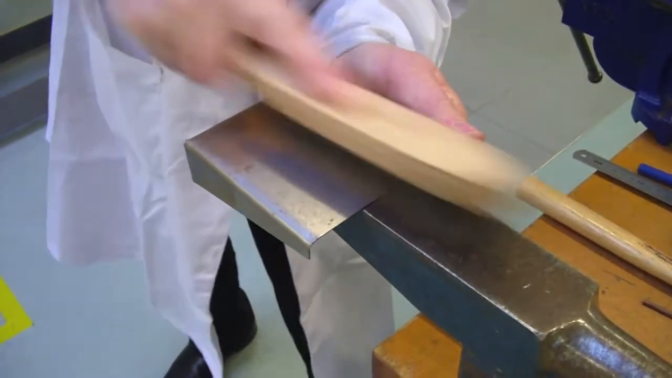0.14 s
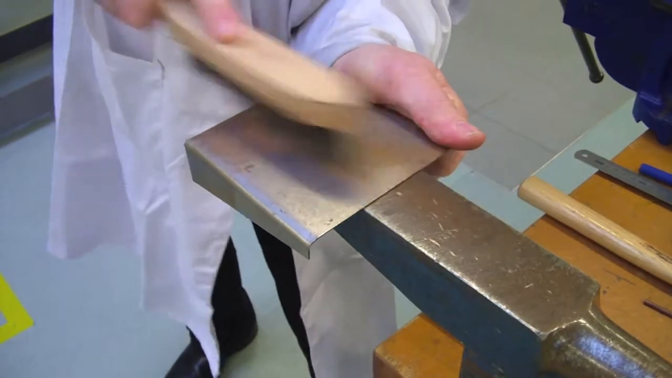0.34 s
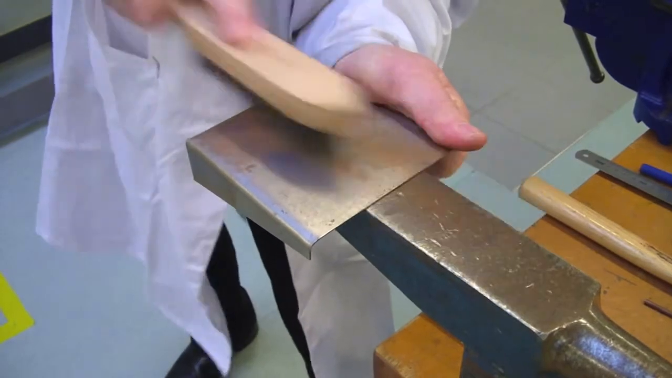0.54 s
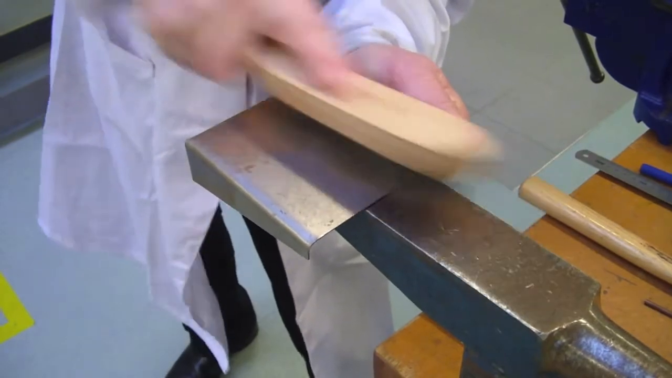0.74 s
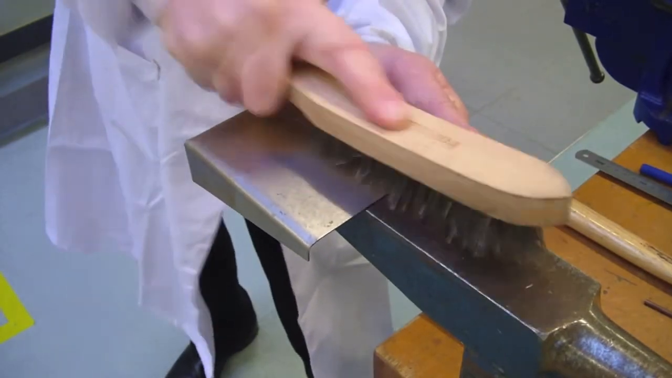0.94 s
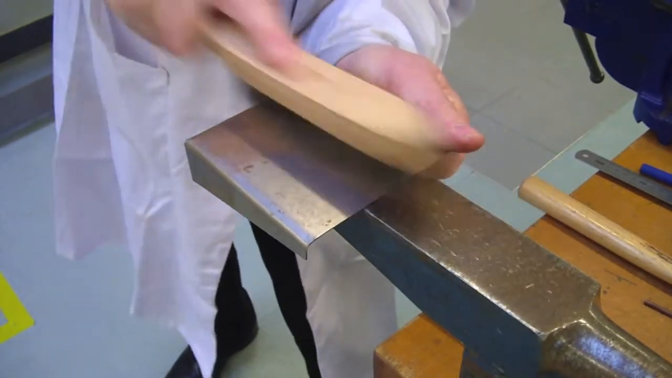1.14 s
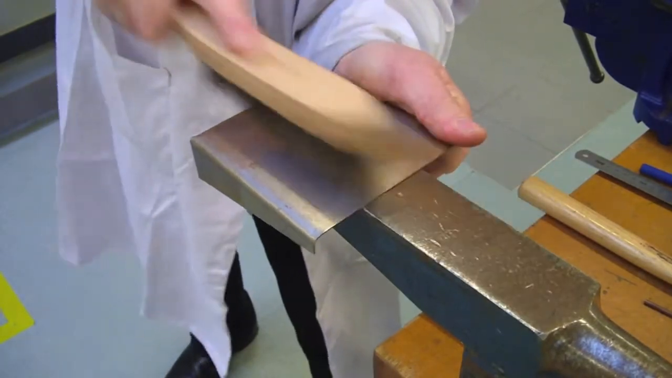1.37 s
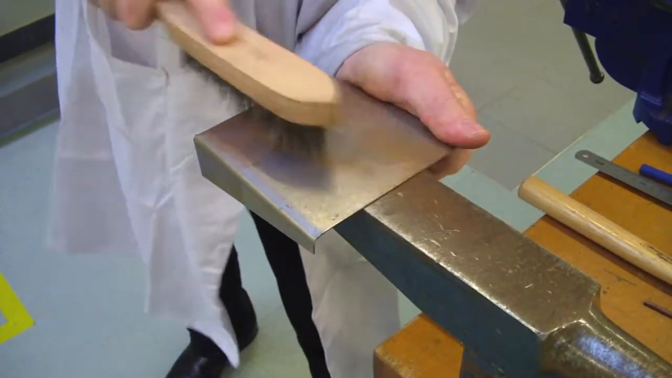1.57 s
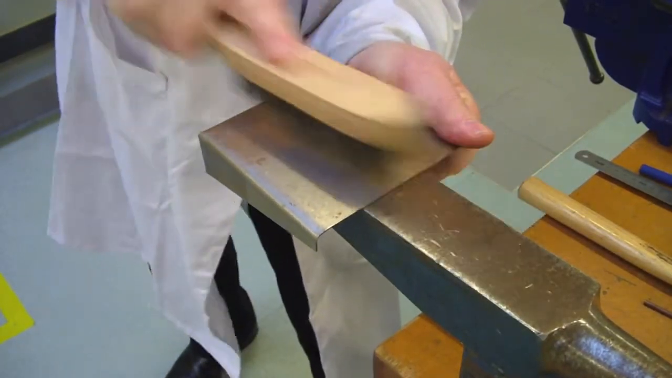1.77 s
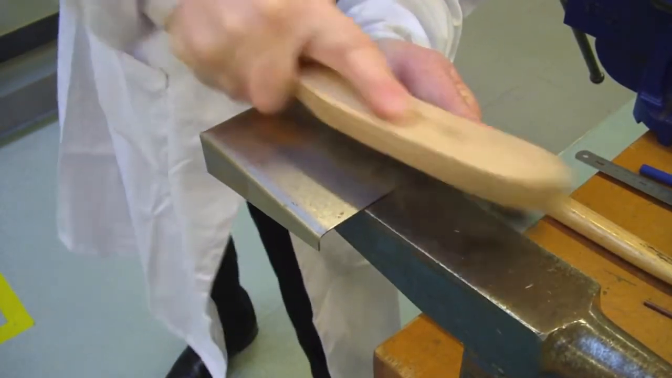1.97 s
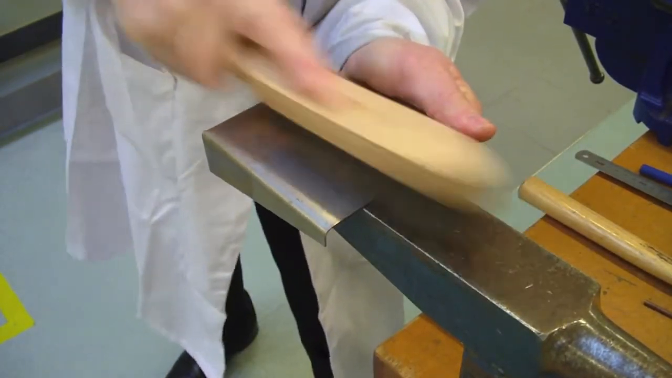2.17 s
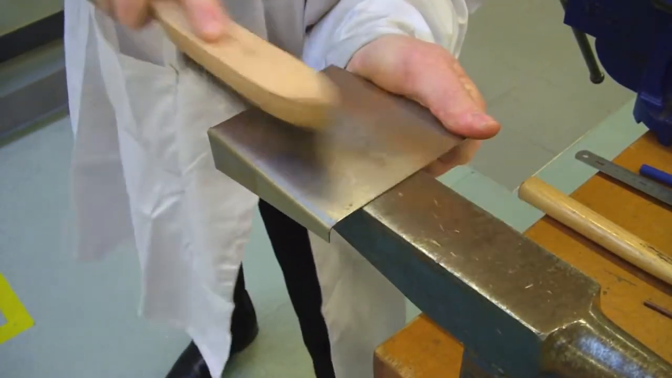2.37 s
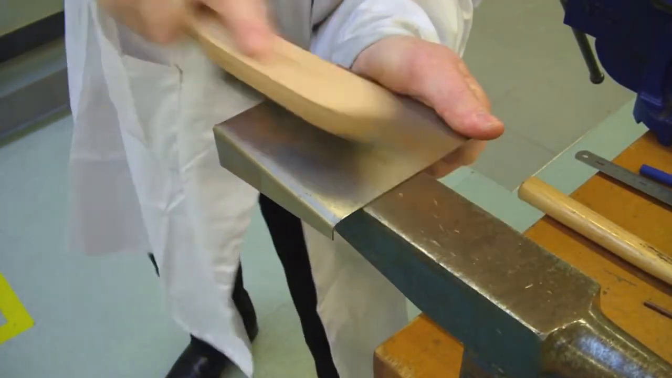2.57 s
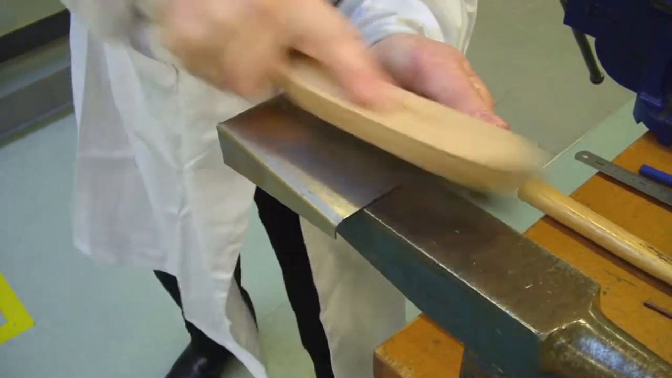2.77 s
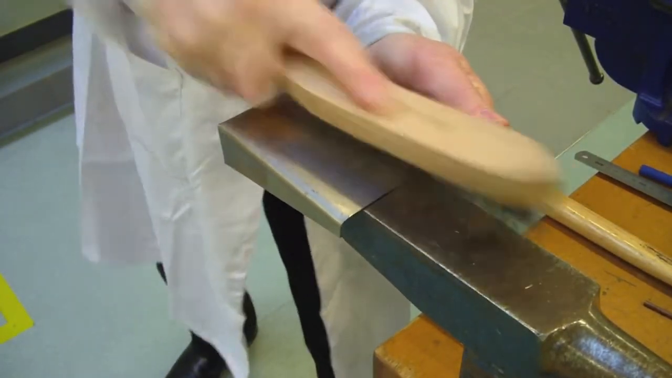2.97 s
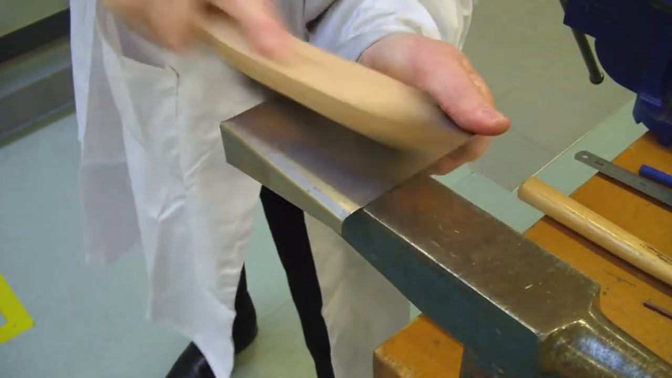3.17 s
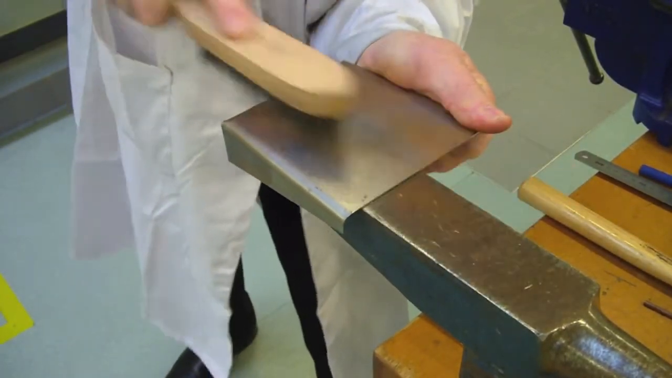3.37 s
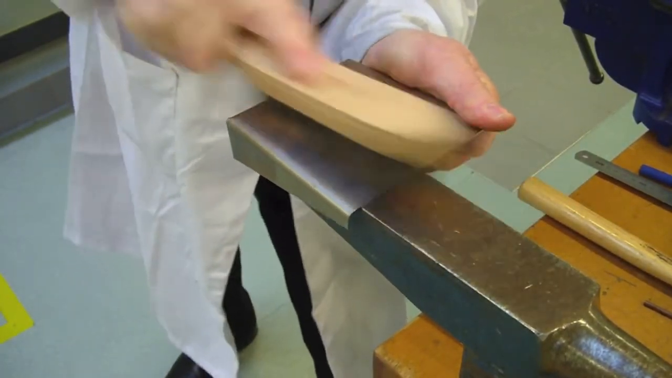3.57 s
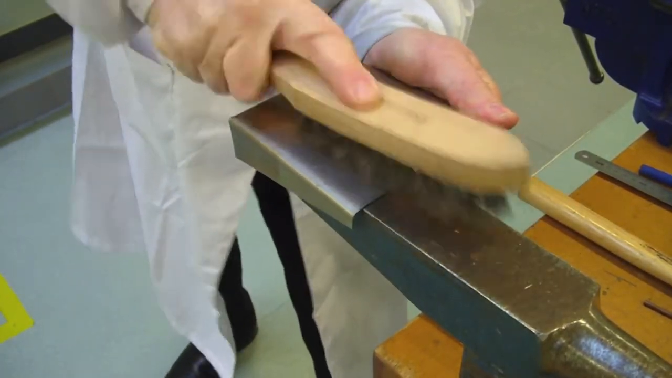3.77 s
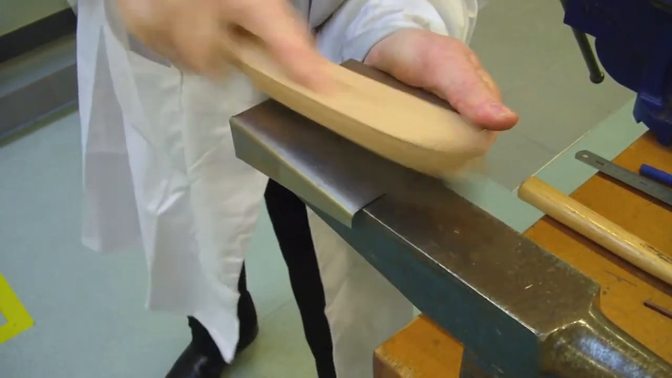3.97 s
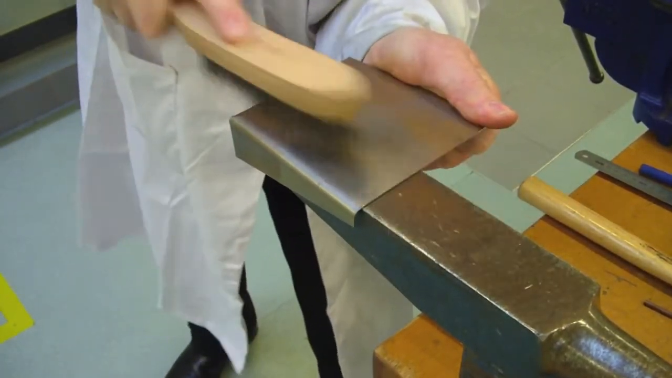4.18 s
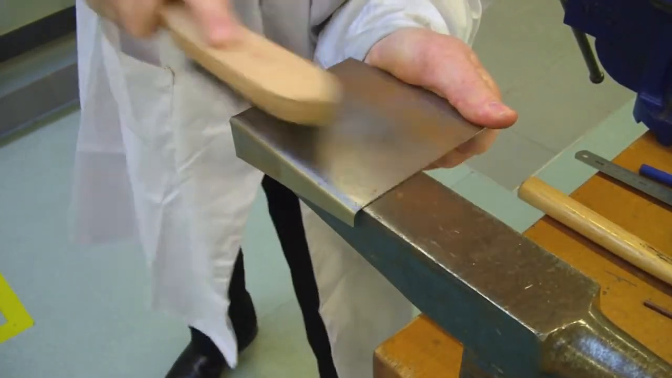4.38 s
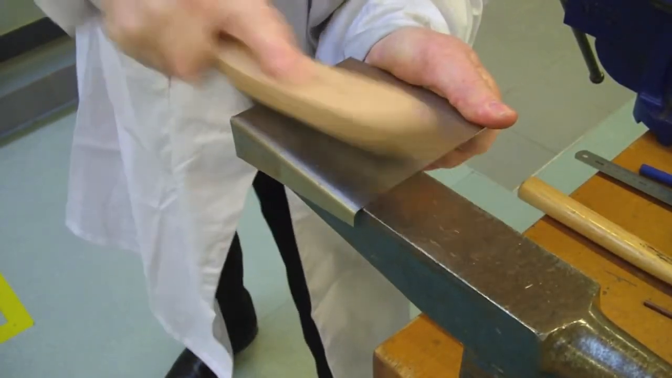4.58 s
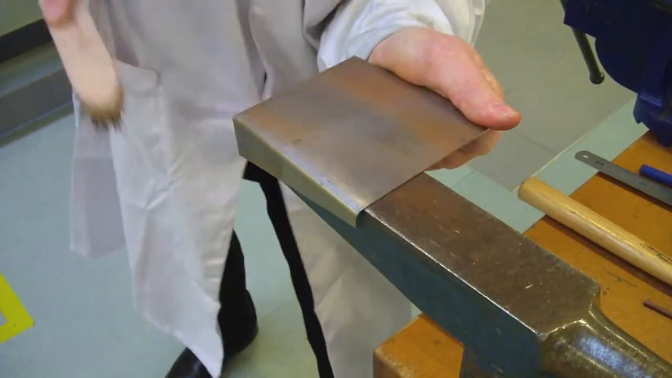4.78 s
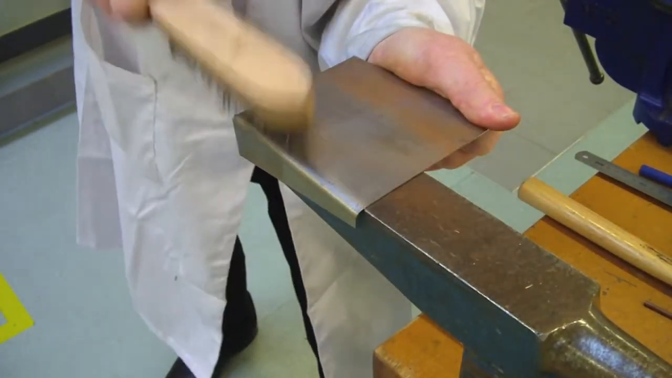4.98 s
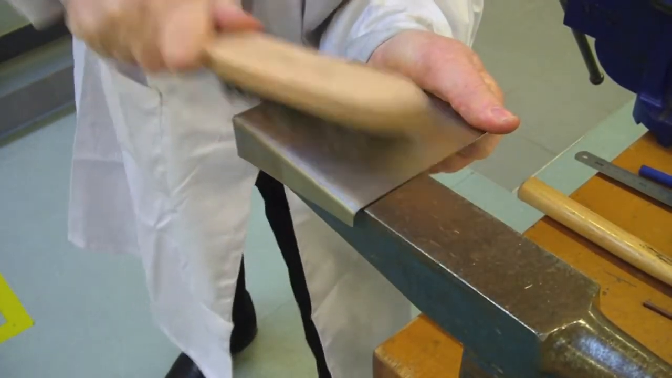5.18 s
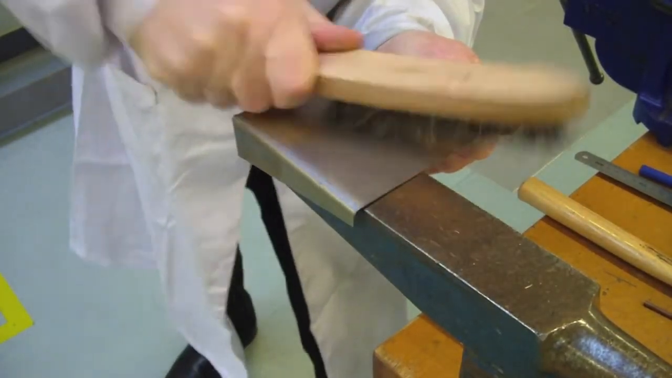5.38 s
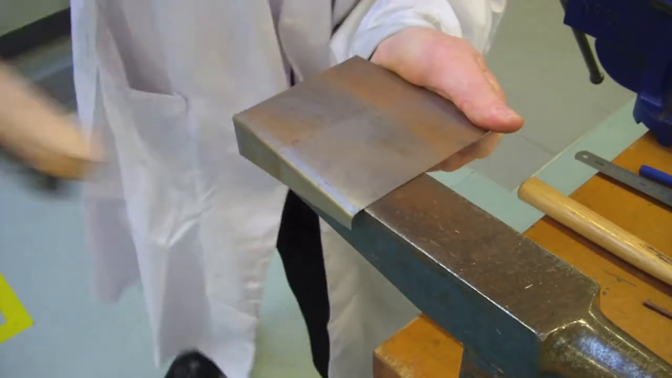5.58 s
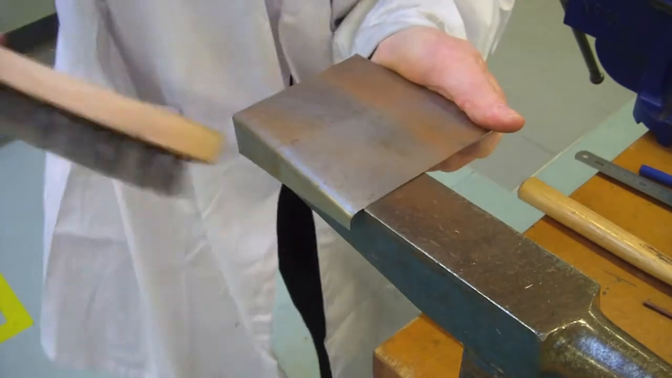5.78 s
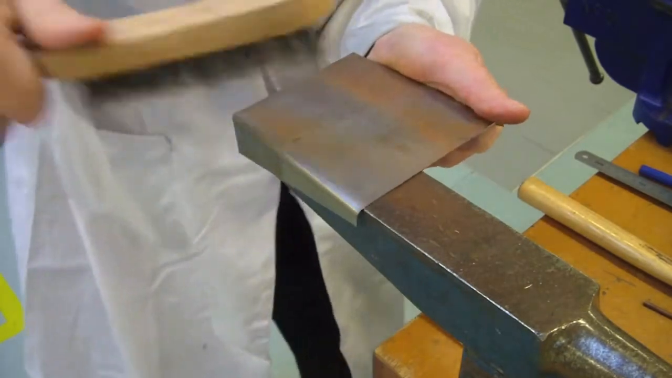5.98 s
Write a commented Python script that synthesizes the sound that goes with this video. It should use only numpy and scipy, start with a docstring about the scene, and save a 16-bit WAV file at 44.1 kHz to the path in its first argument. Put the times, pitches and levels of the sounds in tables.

```python
"""In a workshop, a hand wire brush scrubs a bent steel sheet held on an anvil, to and fro about eight strokes
a second; after a pause come a few sideways sweeps, then a faint rustle.
Wire tips slip over the rust as dense clicks that ring in the wires and drive the sheet and the wooden brush back.
Tufts catch and let go, wires squeak, the wood taps the sheet; behind it lie room tail, hiss and a faint hum.
A small stereo recorder hears it through two ports, with narrow notches cut by the recorder."""
import sys
import numpy as np
from scipy import signal
from scipy.fft import rfft, irfft
from scipy.io import wavfile
from scipy.ndimage import uniform_filter1d, minimum_filter1d

SR = 44100
rng = np.random.default_rng(int(sys.argv[2]) if len(sys.argv) > 2 else 0)


def to_wav(sig):
    """Store sig (one row per channel, or 1-D mono) as 16-bit WAV at the path in sys.argv[1].

    Samples outside -1..1 are clipped; the rate is SR.
    """
    pcm = np.clip(np.atleast_2d(sig), -1, 1) * 32767
    pcm = np.round(pcm).astype(np.int16)
    wavfile.write(sys.argv[1], SR, pcm.T)  # frames by channels


N = 265780

# Workshop air, spectrum of its hiss: (frequency [Hz], density [dB per Hz])
AIR_SPECTRUM = [(30, -24), (100, -10.5), (190, -11), (300, -2), (700, -1.5), (1300, -2), (3500, 2.5),
                (5700, -4), (7000, -13), (8500, -16), (11000, -38), (15000, -55)]
AIR_DB = -56.5
HUM_HZ, HUM_WIDTH_HZ, HUM_DB = 285.6, 7, -76.5
SHOP_T60_S, SHOP_DB = 0.36, -18   # decay time of the room tail and its level against the direct sound

# Wood of the brush taps the sheet: (time [s], level [dB], crack pitch [Hz], ring against crack [dB])
TAPS = [(4.747, -24, 1220, -10.5), (4.776, -28.5, 3200, -20), (5.027, -13, 2270, -25.5),
        (5.585, -26, 3260, -26), (5.588, -16, 3300, -13.5), (5.786, -43.5, 2770, -12),
        (5.865, -43, 1970, -11), (5.994, -39, 1070, -25)]
# Modes of the tapped sheet: (frequency [Hz], level [dB], t60 [s])
TAPPED_MODES = [(601, -9.5, 0.077), (1316, -1, 0.05), (1640, -2.5, 0.061), (2680, 4, 0.076),
                (2930, 2, 0.056), (3400, 1.5, 0.062), (4630, -13, 0.05), (5600, -13, 0.17)]
# A wire squeaks upward as it drags to a halt:
# (start [s], length [s], from pitch [Hz], to pitch [Hz], level [dB])
SQUEAKS = [(0.066, 0.024, 8200, 9260, -28.5), (0.862, 0.014, 8800, 9300, -29),
           (1.606, 0.034, 8460, 9200, -29), (1.857, 0.027, 8720, 9000, -31),
           (4.735, 0.025, 9000, 9600, -39)]
# A tuft catches and springs free: (time [s], level [dB], twang pitch [Hz])
CATCHES = [(0.3168, -5, 3930), (0.8032, 4, 4030), (1.0647, 5.5, 4090), (1.1287, -19, 4000),
           (1.5791, -5.5, 3900), (1.692, -1, 4150), (1.8117, -7.5, 3800), (2.0808, 2, 4160),
           (2.4389, -20, 4300), (2.6998, -11, 3850), (2.849, -6.5, 4100), (3.6133, -9, 4070),
           (4.153, -5, 4260), (4.546, -14, 3460), (5.025, -4.5, 4220), (5.0424, -22, 4000),
           (5.0998, -9, 3570), (5.232, -8, 5900), (5.2716, -14, 5530), (5.5654, -13, 4340)]

# To-and-fro strokes, pull and push in turn:
# (start [s], length [s], level [dB], first bite over that level [dB])
STROKES = [(-0.004, 0.11, -18.5, -2), (0.134, .105, -16.5, 5), (0.26, 0.11, -19, -2), (0.39, 0.1, -17.5, 1),
           (0.509, 0.11, -17, -2.5), (0.647, 0.11, -18, 3), (0.759, 0.13, -19.5, 0.7),
           (0.894, 0.11, -18, 3), (1.016, 0.12, -19, 0.5), (1.158, 0.11, -18.5, 0), (1.282, 0.1, -17.5, -3),
           (1.413, 0.1, -16.5, 1.5), (1.525, .11, -18, -1.5), (1.657, 0.096, -17.5, 1.5),
           (1.771, 0.11, -19, -3), (1.908, .114, -19, 3.5), (2.027, 0.13, -20, -0.5),
           (2.168, 0.12, -17.5, -.8), (2.292, 0.12, -18, -2.5), (2.429, 0.11, -15.5, 0),
           (2.549, 0.12, -15.5, -3), (2.69, 0.099, -15, 3), (2.805, 0.13, -20, 3.5),
           (2.947, 0.11, -17.5, 3.5), (3.077, 0.1, -17, -1), (3.206, 0.1, -17, 5), (3.327, 0.13, -19, -0.2),
           (3.47, 0.11, -16.5, 2.2), (3.587, 0.13, -22.5, 3.5), (3.722, 0.11, -14.5, -3.5),
           (3.85, 0.1, -16, -3), (3.98, 0.099, -15.5, .4), (4.099, 0.089, -22, 3), (4.229, 0.094, -23, 2.5),
           (4.35, 0.11, -25, -1.5), (4.472, 0.12, -24, -0.5), (4.6, 0.12, -22, -3.5),
           (4.725, 0.028, -27.5, 1.5)]
# Sideways sweeps after the pause, with shallower turns: columns as for STROKES
SWEEPS = [(5.025, 0.14, -23.5, 0.6), (5.205, .082, -18, -4.5), (5.329, 0.1, -17, 1), (5.451, 0.05, -22, .4),
          (5.509, .074, -24, 3.5)]
# A faint rustle at the end: one row, columns as for STROKES
RUSTLE = (5.868, 0.2, -50.5, -3)
# What all pulls share, levels against the stroke's own:
# (rise [s], exit level [dB], rest at the turn [dB], sheet level [dB], wood level [dB])
PULL_SHAPE = (0.0146, -4, -15.5, -16, -34.5)
# What all pushes, all sweeps and the rustle share: columns as for PULL_SHAPE
PUSH_SHAPE = (.011, -4, -14, -12.5, -33.5)
SWEEP_SHAPE = (.012, -0.6, -8, -16.5, -31.5)
RUSTLE_SHAPE = (.006, -8, -11, -7, -18)
LIFTED_DB = -62   # tips with the brush off the sheet

# Slow change of colour as the brush works over the sheet:
# (time [s], low wires [dB], high wires [dB], sheet [dB], wood [dB])
COLOUR = [(0, 6.5, 1, 0, 1.5), (1.1, 4, -0.2, -0.8, 0.9), (2, 4.5, -0.5, -0.5, 1.7),
          (2.5, -5.5, -1.5, -2.2, -0.5), (3.3, -5.5, -0.9, 0, 1.5), (4.1, -2, 1.5, -0.3, 2.8),
          (4.7, -.6, 1.5, 0, 4), (5.1, -1, -1, 1, -0.5), (5.6, -6.5, 0, -1.3, 2.5), (6, 13, -0.5, 0, 2)]
# Broad resonances of the sheet under the brush: (frequency [Hz], nominal width [Hz], level [dB])
SHEET_MODES = [(1004, 23, -14), (1226.4, 126, -3.5), (1488, 184, 1), (1735, 83, 2), (2322, 170, 0.5)]
# Broad resonances of the wooden brush back: columns as for SHEET_MODES
WOOD_MODES = [(394.6, 76, -5), (467, 120, -8.5), (584, 113, 3), (823, 510, -0.5)]
# Spectrum of the wire tips: (frequency [Hz], density [dB per Hz])
TIP_SPECTRUM = [(700, -59), (1500, -12.5), (2200, -11), (3100, -4), (4200, 1.5), (4900, -4.5), (5600, -0.5),
                (6600, -8), (7100, -14), (8500, -18.5), (11000, -25), (13000, -30), (14000, -34.5),
                (14600, -53), (15000, -56)]
SLIP_SPREAD_DB = 1.5

# Microphone ports: (frequency [Hz], likeness [0-1], left over right [dB], left lead [radians])
PORTS = [(130, .96, .4, 0), (300, .998, 0, 0), (1500, .993, .2, 0), (2000, .97, 1.2, 0),
         (4200, .97, 5.5, 0), (4800, .88, 7.5, .2), (5500, .95, 4.5, .9), (6600, .8, -.5, 1.2),
         (7400, .7, -1, .2), (8400, .75, -4.5, .7), (9600, .4, -8, .5), (11400, .86, -1.5, 0),
         (12700, .3, -7.5, -.5), (13400, .6, -2, -.7), (14000, .93, 0, 0)]
# Notch filters of the recorder: (frequency [Hz], width [Hz], depth of each of two stages [dB])
NOTCHES = [(1400, 140, -11), (4900, 380, -15), (7430, 560, -16.5), (9820, 720, -19.5)]
LIMIT, CUTOFF_HZ = 0.8, 14950   # limiter threshold (full scale 1), top of the band


def from_db(db):
    """Amplitude gain of a level in dB."""
    return 10 ** (np.asarray(db) / 20)


def rms_one(x):
    """Scale to unit rms."""
    return x / np.sqrt(np.mean(x ** 2) + 1e-20)


def over_hz(points):
    """Columns of a spectrum table on the FFT grid, interpolated over log frequency."""
    hz, *columns = np.transpose(points)
    grid = np.log(np.maximum(np.arange(N // 2 + 1) * SR / N, 1))
    return [np.interp(grid, np.log(hz), column) for column in columns]


def coloured(x, points):
    """Filter through a smooth spectrum, then scale to unit rms."""
    gain_db = over_hz(points)[0]
    return rms_one(irfft(rfft(x) * from_db(gain_db), N))


def drift(rate_hz):
    """Random wander of unit rms: noise through two equal one-pole lowpasses."""
    pole = np.exp(-2 * np.pi * rate_hz / SR)
    noise = rng.standard_normal(N + SR)
    settled = signal.lfilter([1], [1, -2 * pole, pole * pole], noise)[SR:]
    return rms_one(settled)


def resonate(x, hz, width_hz):
    """One two-pole resonance, gain 1 at its peak."""
    r = np.exp(-np.pi * width_hz / SR)
    feedback = [1, -2 * r * np.cos(2 * np.pi * hz / SR), r * r]
    return signal.lfilter([(1 - r * r) / 2, 0, (r * r - 1) / 2], feedback, x)


def resonate_twice(x, hz, width_hz):
    """Two equal resonances in series, for steeper skirts."""
    return resonate(resonate(x, hz, width_hz), hz, width_hz)


def hum(noise):
    """Narrow resonance of noise, so that the hum wavers."""
    return from_db(HUM_DB) * rms_one(resonate_twice(noise, HUM_HZ, HUM_WIDTH_HZ))


def air():
    """Steady workshop hiss, unrelated in the two versions, with the hum on top."""
    white = rng.standard_normal((2, N))
    return from_db(AIR_DB) * coloured(white, AIR_SPECTRUM) + hum(white)


def shop(x):
    """Diffuse room tail: dying noise after a short gap, a different one for each version of the sound."""
    t = np.arange(SR) / SR
    tail = rng.standard_normal((2, SR)) * from_db(-60 * t / SHOP_T60_S) * (t > 0.008)
    tail = signal.lfilter([0.5], [1, -0.5], tail)   # walls dull the treble
    tail = tail / np.sqrt(np.sum(tail ** 2, axis=1, keepdims=True))
    return from_db(SHOP_DB) * signal.fftconvolve(x, tail, axes=1)[:, :N]


def taps():
    """Each tap is a short crack that strikes every mode of the sheet with its own strength."""
    out = np.zeros(N)
    strengths_db = rng.normal(0, 1, (len(TAPS), len(TAPPED_MODES)))
    t = np.arange(SR // 4) / SR
    soft = 1 - np.exp(-t / 0.00053)   # wood gives a little at the contact
    for (start, db, crack_hz, ring_db), strength_db in zip(TAPS, strengths_db):
        rings = 0
        for (hz, mode_db, t60), own_db in zip(TAPPED_MODES, strength_db):
            decay = from_db(mode_db + own_db + ring_db - 60 * t / t60)
            beat = 1 + 0.58 * np.sin(2 * np.pi * 0.044 * hz * t)   # close modes beat together
            rings = rings + decay * np.sin(2 * np.pi * hz * t) * beat
        noise = rng.standard_normal(len(t))
        crack = resonate(resonate(noise, crack_hz, 0.67 * crack_hz), crack_hz, 0.77 * crack_hz)
        crack = rms_one(crack) * np.exp(-t / 0.0032)
        at = round(start * SR)
        out[at:at + len(t)] += (from_db(db) * soft * (rings + crack))[:N - at]
    return out


def squeaks():
    """Rough rising whistles: sines whose gliding pitch is jittered at every sample."""
    out = np.zeros(N)
    for start, length, low_hz, high_hz, db in SQUEAKS:
        t = np.arange(round(length * SR)) / SR
        jitter_hz = rng.normal(0, 700, len(t))
        pitch_hz = low_hz + (high_hz - low_hz) * t / length + jitter_hz
        phase = 2 * np.pi * np.cumsum(pitch_hz) / SR
        at = round(start * SR)
        out[at:at + len(t)] = from_db(db) * np.sin(np.pi * t / length) * np.sin(phase)
    return out


def catches(swell_s=0.00064, die_s=0.0034):
    """Short swarms of slips in one broad resonance when a tuft lets go."""
    t = np.arange(SR // 20) / SR
    out = np.zeros((2, N))
    envelope = (1 - np.exp(-t / swell_s)) * np.exp(-t / die_s)
    for start, db, hz in CATCHES:
        noise = rng.standard_normal((2, len(t)))
        swarm = rms_one(resonate(resonate(noise, hz, 0.051 * hz), hz, 2.0 * hz))
        at = round(start * SR)
        out[:, at:at + len(t)] += from_db(db) * envelope * swarm
    return out


def colour():
    """Columns of the colour table at every sample."""
    times, *columns = np.transpose(COLOUR)
    return [np.interp(np.arange(N) / SR, times, column) for column in columns]


def stroke_levels(fall_s=0.01):
    """Each stroke bites fast, runs, slows and rests at the turn: levels in dB of tips, sheet and wood."""
    start, length, level, bite = np.transpose(STROKES + SWEEPS + [RUSTLE])
    shapes = [(PULL_SHAPE, PUSH_SHAPE)[k % 2] for k in range(len(STROKES))]
    shapes += [SWEEP_SHAPE] * len(SWEEPS) + [RUSTLE_SHAPE]
    rise_s, leave, rest, sheet, wood = np.transpose(shapes)

    lifts = np.diff(start, append=0) - length > 0.1   # a long wait: the brush leaves the sheet
    turn = np.where(lifts, LIFTED_DB, level + rest)
    before = np.r_[turn[0], turn[:-1]]
    landing = np.r_[False, lifts[:-1]]
    rise = np.where(landing, 0.001, rise_s)   # from the air the brush lands at once

    middle = start + length / 2
    times = np.c_[start - rise / 4, start + rise, middle, start + 0.88 * length, start + length + fall_s].ravel()
    levels = np.c_[before, level + bite, level, level + leave, turn].ravel()
    t = np.arange(N) / SR
    tips_db = np.interp(t, np.maximum.accumulate(times), levels)
    _, _, sheet_colour, wood_colour = colour()
    sheet_db = sheet_colour + np.interp(t, middle, sheet)
    wood_db = wood_colour + np.interp(t, middle, wood)
    return tips_db, sheet_db, wood_db


def slips():
    """Two unrelated swarms of wire slips, uneven in size and random in sign; unit rms."""
    size = np.minimum(rng.exponential(1, (2, N)), 4)
    return rms_one(from_db(SLIP_SPREAD_DB * size) * rng.choice([-1, 1], (2, N)))


def body(x, modes, wander_db):
    """Parallel resonances whose strengths wander with the place of contact; unit rms."""
    total = 0
    for k, (hz, width_hz, db) in enumerate(modes):
        strength = from_db(db + wander_db * drift(17.0))
        # each single stage is wider, since two in series narrow the peak
        total = total + (-1) ** k * strength * resonate_twice(x, hz, 1.38 * width_hz)
    return rms_one(total)


def wood_back(push, tips_db, wood_db):
    """Slips drive the wooden back, which speaks most when the stroke reverses and the tufts flip over."""
    smooth_db = signal.lfilter([0.002], [1, -0.998], tips_db)
    flip = 1 + 65 * np.maximum(np.diff(smooth_db, prepend=-25), 0)   # only rising level counts
    drive = signal.lfilter([0.003], [1, -0.997], push * flip)
    return drive * from_db(wood_db) * body(slips(), WOOD_MODES, wander_db=2.5)


def steel_sheet(push, sheet_db):
    """Slips drive the broad modes of the sheet, which ring on a little into the turns."""
    drive = signal.lfilter([0.004], [1, -0.996], push)
    return drive * from_db(sheet_db + 2.3 * drift(32)) * body(slips(), SHEET_MODES, wander_db=4.5)


def wires(push_db, patchy_db, sharpness=8.44, count=30):
    """Slips are dealt to groups of wires, each ringing at its own pitch and biting in fits of its own."""
    # the short, high wires stay in touch through the turns and swell more softly
    softer_db = uniform_filter1d(push_db, size=1500) - push_db
    low_db, high_db, _, _ = colour()
    swarm = slips()
    dealt = rng.integers(0, count, (2, N))
    out, neighbour = 0, drift(20)
    for k, hz in enumerate(np.geomspace(1000, 15000, count)):
        own = drift(19.6)
        tone_db = low_db * np.clip(np.log2(3600 / hz), 0, 1)
        tone_db = tone_db + high_db * np.clip(2 * np.log2(hz / 4300), 0, 1)
        tone_db = tone_db + 0.84 * softer_db * np.clip(np.log2(hz / 5500), 0, 1)
        fits_db = patchy_db * (own + 0.47 * neighbour)   # groups next in pitch partly bite together
        group = resonate_twice(swarm * (dealt == k), hz, hz / sharpness)
        out = out + from_db(tone_db + fits_db) * group
        neighbour = own
    return coloured(out, TIP_SPECTRUM)


def brush():
    """Slips ring in the wires and drive sheet and wood; pressure is uneven within a stroke."""
    tips_db, sheet_db, wood_db = stroke_levels()
    push_db = tips_db + 1.17 * drift(43) + 0.51 * drift(180)
    push = from_db(push_db)
    bodies = wood_back(push, tips_db, wood_db) + steel_sheet(push, sheet_db)
    return bodies + squeaks() + catches() + push * wires(push_db, patchy_db=3.0)


def scene():
    """Two versions of the sound field, mixed into what both ports hear and what differs between them."""
    # a small sheet radiates no bass
    highpass = signal.butter(4, 330, "high", fs=SR, output="sos")
    work = signal.sosfilt(highpass, brush() + taps())
    common, apart = rfft(air() + shop(work) + work)
    alike = np.clip(over_hz(PORTS)[0], 0, 1)
    shared = np.sqrt((1 + alike) / 2) * common
    differing = np.sqrt((1 - alike) / 2) * apart * [[1], [-1]]
    return irfft(shared + differing, N)


def ports(x):
    """The two ports tilt and shift the channels against each other by frequency."""
    _, tilt_db, lead = over_hz(PORTS)
    side = np.array([[0.5], [-0.5]])
    return irfft(rfft(x) * from_db(side * tilt_db) * np.exp(1j * side * lead), N)


def limiter(x, size=401):
    """Both channels duck together, smoothly, around peaks over the limit."""
    allowed = np.minimum(1, LIMIT / (np.max(np.abs(x), axis=0) + 1e-9))
    held = minimum_filter1d(allowed, size=size)
    gain = uniform_filter1d(uniform_filter1d(held, size=size // 2), size=size // 2)
    return x * gain


def notch(x, hz, width_hz, depth_db):
    """Two equal stages, each with zeros close to its poles that cut a narrow dip."""
    w, pole = 2 * np.pi * hz / SR, np.pi * width_hz / SR
    zero = pole * from_db(depth_db)
    middle = -2 * np.cos(w)
    stage = np.array([1 + zero, middle, 1 - zero, 1 + pole, middle, 1 - pole]) / (1 + pole)
    return signal.sosfilt([stage, stage], x)


def record(dry):
    """The recorder: two ports, a limiter, narrow notches, and a steep cut of the top."""
    out = limiter(ports(dry))
    for hz, width_hz, depth_db in NOTCHES:
        out = notch(out, hz, width_hz, depth_db)
    return signal.sosfilt(signal.ellip(14, 0.5, 75, CUTOFF_HZ, fs=SR, output="sos"), out)


dry = scene()
out = record(dry)
to_wav(out)
```